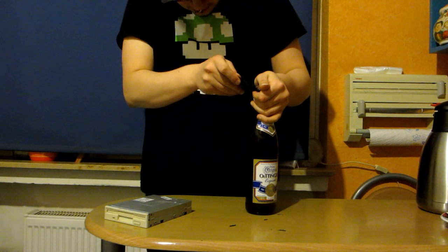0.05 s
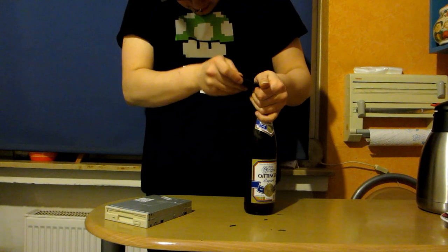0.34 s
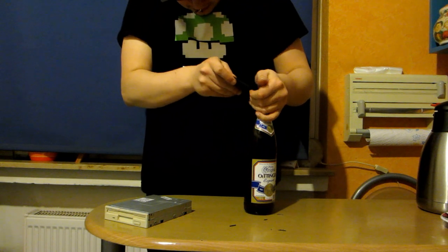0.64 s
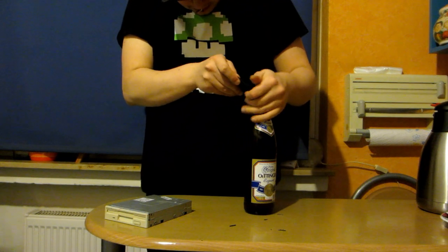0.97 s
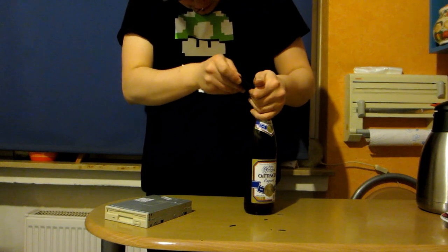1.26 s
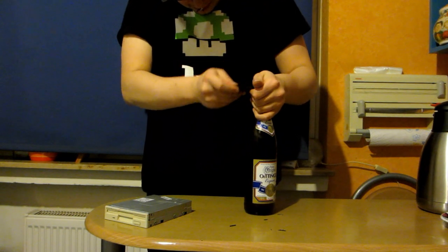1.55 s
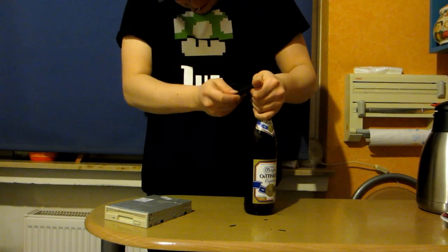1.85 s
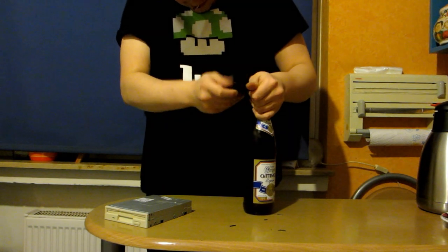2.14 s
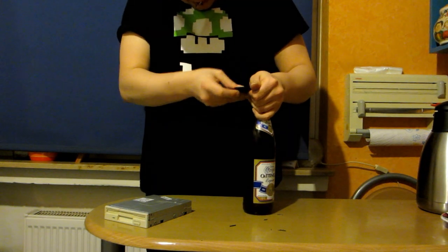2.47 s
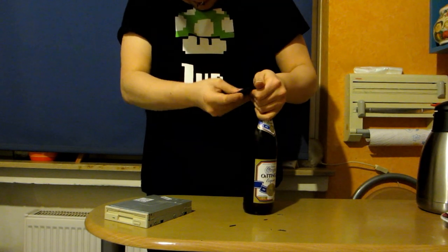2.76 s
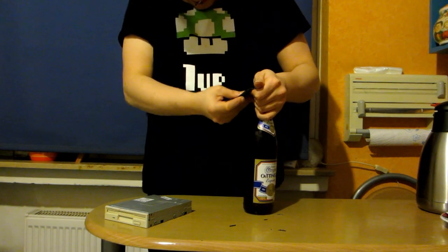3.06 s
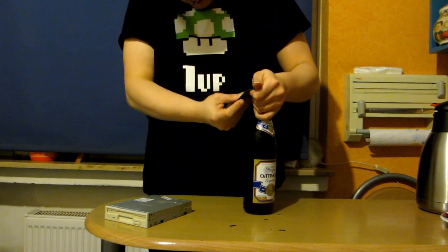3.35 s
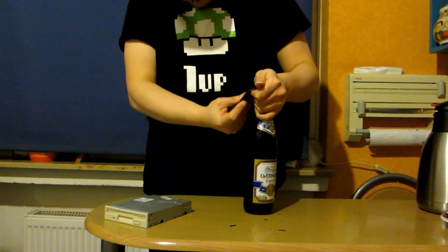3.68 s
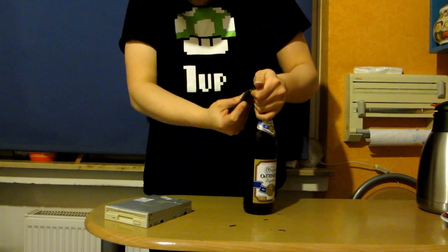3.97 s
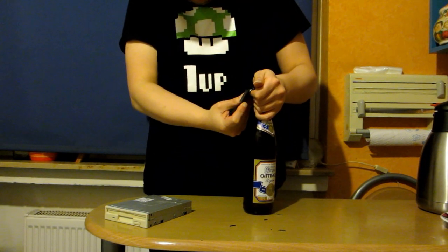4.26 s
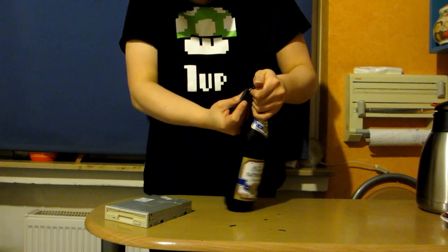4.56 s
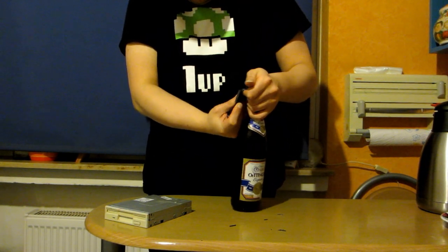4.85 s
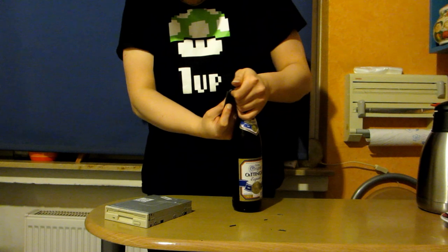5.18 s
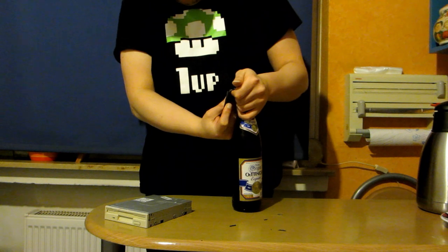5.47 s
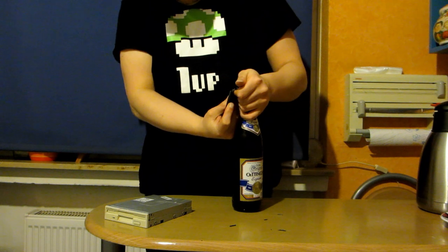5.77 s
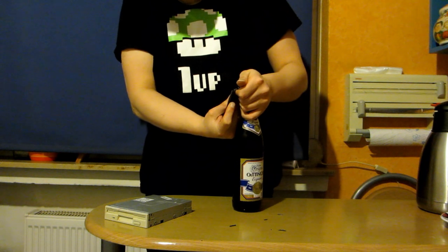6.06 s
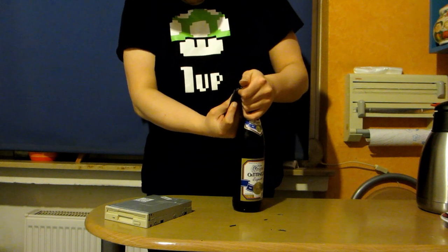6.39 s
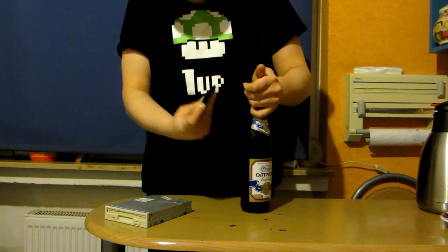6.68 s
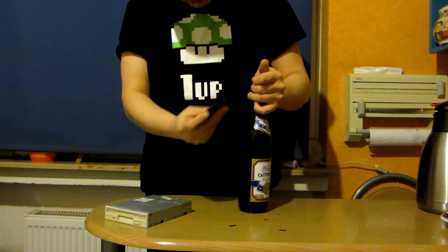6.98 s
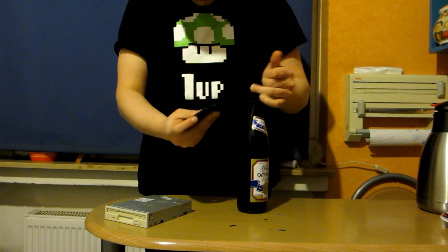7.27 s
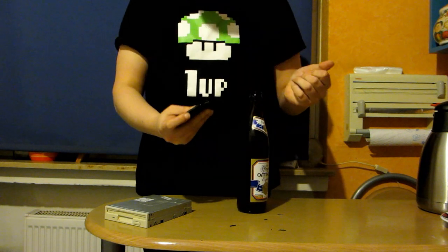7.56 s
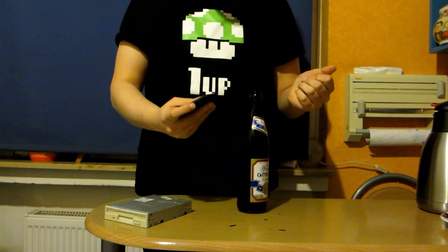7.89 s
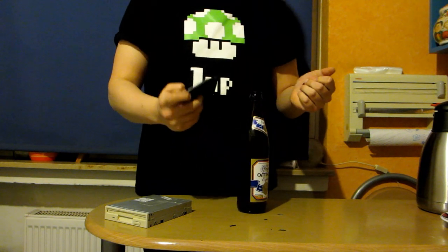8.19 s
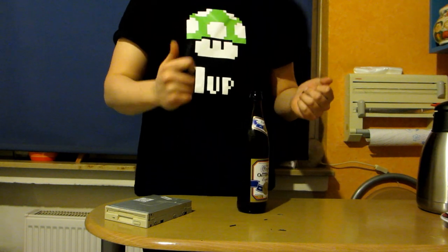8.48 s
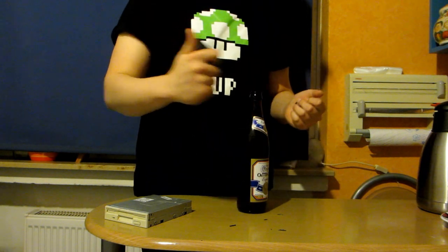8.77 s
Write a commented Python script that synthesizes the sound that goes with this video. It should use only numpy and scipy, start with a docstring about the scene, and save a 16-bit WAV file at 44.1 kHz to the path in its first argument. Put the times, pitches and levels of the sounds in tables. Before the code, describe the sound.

In a bare, ringing kitchen, a glass bottle knocks dully on a table while a plastic disk scrapes and slips off its metal cap in irregular clicks and sharp snaps. The bottle skids briefly, then opens with a loud pop and a puff of gas. A few knocks and light ticks follow, and the disk lands on the table with a boom. A low hum and faint camera whirr sit close to the microphone.

```python
"""Bare, ringing kitchen: a flat plastic disk is levered under the crown cap of a glass bottle.
Its edge scrapes and snaps off the crimps; the bottle knocks and skids, driving the table's modes.
The seal breaks: the air in the neck rings, gas puffs out, the cap flicks free.
The disk lands on the table with a boom. Underneath: low hum, whirr and steps of a camera's lens drive."""
import sys
import numpy as np
from scipy import signal
from scipy.fft import rfft, irfft
from scipy.io import wavfile

SR = 44100
rng = np.random.default_rng(int(sys.argv[2]) if len(sys.argv) > 2 else 0)


def materialize(psi):
    """Save the field psi as 16-bit PCM at rate SR to the path in sys.argv[1].

    A 1-D psi becomes a single channel; in a 2-D psi each row is a channel.
    """
    bounded = np.clip(np.atleast_2d(psi).T, -1, 1)
    quanta = np.round(bounded * 32767).astype(np.int16)
    wavfile.write(sys.argv[1], SR, quanta)


N = 398223
TIME_S = np.arange(N) / SR
CUTOFF_HZ = 16000


def from_db(db):
    """Decibels to gain."""
    return 10 ** (np.asarray(db) / 20)


def unit(x):
    """Scale to unit energy."""
    return x / np.sqrt(np.sum(x ** 2) + 1e-20)


def envelope(points):
    """Gain curve from (time [s], level [dB]); silent outside the points."""
    times_s, levels_db = np.transpose(points)
    return from_db(np.interp(TIME_S, times_s, levels_db, left=-200, right=-200))


def at_hz(points, hz):
    """Interpolate on a log-frequency axis."""
    points = np.array(points)
    return np.interp(np.log(hz + 1e-9), np.log(points[:, 0]), points[:, 1])


def colour(points, size=4096):
    """Unit-energy, minimum-phase impulse response from (frequency [Hz], level [dB])."""
    magnitude = from_db(at_hz(points, np.fft.rfftfreq(size, 1 / SR)))
    cepstrum = irfft(np.log(magnitude))
    cepstrum[1:size // 2] *= 2
    cepstrum[size // 2 + 1:] = 0
    return unit(irfft(np.exp(rfft(cepstrum))))


def through(x, response):
    """Convolve, keeping the input length."""
    return signal.oaconvolve(x, response)[:len(x)]


def butter(x, order, hz, kind):
    """Causal Butterworth filter."""
    return signal.sosfilt(signal.butter(order, hz, kind, fs=SR, output="sos"), x)


def modes(rows):
    """One second of decaying sines, alternating in sign."""
    t = TIME_S[:SR]
    return sum((-1) ** k * from_db(db) * 1e-3 ** (t / t60_s) * np.sin(2 * np.pi * hz * t)
               for k, (hz, db, t60_s) in enumerate(rows))


def burst(t60_s):
    """Dying flurry of tiny slips, as decaying noise."""
    t = TIME_S[:SR // 2]
    return unit(rng.standard_normal(len(t)) * 1e-3 ** (t / t60_s))


def grains(per_s, spread_db):
    """Random stick-slip impulses of uneven size, rms 1."""
    sizes = from_db(spread_db * np.minimum(rng.exponential(1, N), 4))
    signs = rng.choice([-1, 1], N)
    slips = rng.random(N) < per_s / SR
    return unit(sizes * signs * slips) * np.sqrt(N)


def add(track, time_s, sound):
    """Mix a sound in at time_s."""
    start = round(time_s * SR)
    track[start:start + len(sound)] += sound[:N - start]


# Room decay (frequency [Hz], T60 [s])
ROOM_DECAY = [(150, .62), (400, 0.45), (1000, 0.37), (2700, 0.49), (7000, 0.38), (14000, 0.22)]

def kitchen(wet_db, build_s=0.001, crack_gain=0.9):
    """New random room path per call: direct sound, close bounces, a tail dying soonest at the top."""
    t, hz = TIME_S[:SR], np.fft.rfftfreq(SR, 1 / SR)
    white = rfft(rng.standard_normal(SR))
    centres_hz, decays_s = np.transpose(ROOM_DECAY)
    tail = 0
    for weights, t60_s in zip(np.eye(len(centres_hz)), decays_s):
        band = at_hz(list(zip(centres_hz, weights)), hz)
        tail += irfft(white * band, SR) * 1e-3 ** (t / t60_s)
    response = from_db(wet_db) * unit(tail * (1 - np.exp(-t / build_s)))
    add(response, 0, crack_gain * burst(t60_s=0.018))
    response[0] += 0.5
    return unit(response)


# Room rumble spectrum (frequency [Hz], level [dB])
RUMBLE_SPECTRUM = [(25, -9.5), (65, -8), (97, -0.5), (135, -5), (175, -4.5), (400, -11), (700, -11.5),
                   (950, -12), (1300, -33)]
# Lens drive whirr spectrum (frequency [Hz], level [dB])
WHIRR_SPECTRUM = [(700, -27), (1030, -25.5), (1150, -1), (1235, 1.5), (1330, -3), (1600, -13.5),
                  (2200, -24.5), (3300, -32.5), (5000, -39.5), (6800, -35.5), (8500, -40), (16000, -36)]
# Hum and whine (frequency [Hz], rms level [dB])
HUM_TONES = [(96.9, -52.5), (172.3, -57.5), (780.6, -60.5), (3391, -78), (12409, -78.5)]

def background(rumble_db=-44, whirr_db=-45):
    """Steady room rumble, lens drive whirr, hum and whine."""
    rumble = through(rng.standard_normal(N), colour(RUMBLE_SPECTRUM + [(2000, -38), (5000, -67.5)]))
    whirr = through(rng.standard_normal(N), colour(WHIRR_SPECTRUM))
    hum = sum(np.sqrt(2) * from_db(db) * np.sin(2 * np.pi * (hz * TIME_S + rng.random()))
              for hz, db in HUM_TONES)
    return from_db(rumble_db) * rumble + from_db(whirr_db) * whirr + hum


# Lens drive steps (time [s], level [dB])
LENS_STEPS = [(1.2566, -18), (2.739, -26), (3.132, -19.5), (3.550, -12), (4.062, -29.5), (4.3826, -13.5),
              (5.028, -21.5)]

def lens_steps(ring_hz=1250, t60_s=0.013, rebound_s=0.00467, rebound_db=-5):
    """Each drive step rings twice inside the camera body."""
    out = np.zeros(N)
    ring = butter(modes([(ring_hz, 0, t60_s)]), 1, [900, 1800], "band")
    for time_s, db in LENS_STEPS:
        add(out, time_s, from_db(db) * ring)
        add(out, time_s + rebound_s, from_db(db + rebound_db) * ring)
    return out


# Tiny dry clicks (time [s], level [dB])
DRY_CLICKS = [(0.626, -29), (0.833, -32), (1.255, -28), (3.3358, -30), (4.2328, -32.5), (4.381, -25.5),
              (5.0035, -31)]

def clicks(faint_per_s=1.6, faint_db=-35, faint_end_s=5.1):
    """Clicks too near and weak to excite the room; fainter ones fall at random."""
    out = np.zeros(N)
    tone = colour([(1500, -11.5), (3800, -2), (5500, -1), (11000, 2), (16000, -12)])
    faint_times_s = rng.uniform(0, faint_end_s, round(faint_per_s * faint_end_s))
    for time_s, db in DRY_CLICKS + [(s, faint_db) for s in faint_times_s]:
        add(out, time_s, from_db(db) * unit(through(burst(t60_s=0.012), tone)))
    return out


def finger_slide(start_s=7.9, end_s=8.2, start_hz=4900, end_hz=4050, settle_s=0.09, level_db=-63):
    """Fingertip along the disk: friction noise in one narrow, sinking resonance."""
    hz = end_hz + (start_hz - end_hz) * np.exp(-np.maximum(TIME_S - start_s, 0) / settle_s)
    friction = unit(butter(rng.standard_normal(N), 2, 420, "low")) * np.sqrt(2 * N)
    whistle = friction * np.sin(2 * np.pi * np.cumsum(hz) / SR)
    return whistle * envelope([(start_s, level_db), (end_s, level_db)])


# Strokes over the cap (start [s], length [s], level [dB])
RUB_STROKES = [(0.004, 0.028, -42.5), (0.059, 0.013, -48), (1.073, 0.022, -46.5), (1.176, 0.017, -47),
               (2.18, 0.033, -34), (2.416, 0.089, -26.5), (2.717, .02, -57), (3.67, 0.017, -41),
               (3.935, 0.011, -50), (5.581, 0.051, -46.5), (8.197, .015, -45), (8.272, .02, -47.5),
               (8.37, 0.1, -41), (8.604, 0.022, -47.5)]
# Rubbing spectrum (frequency [Hz], level [dB])
RUB_SPECTRUM = [(250, -10.5), (450, 1.5), (700, -4), (1550, -3.5), (2150, 5), (2700, -4), (4000, -13),
                (6000, -17), (12000, -20), (16000, -25.5)]

def rubbing(swell_db=10.5, release_db_per_s=210.5):
    """Skin and plastic drag over the cap in fine grains; pressure builds, then eases."""
    pressure = np.zeros(N)
    for start_s, length_s, db in RUB_STROKES:
        end_s = start_s + length_s
        pressure += envelope([(start_s, db - swell_db), (end_s, db), (end_s + 1, db - release_db_per_s)])
    return through(grains(per_s=1200, spread_db=5) * pressure, colour(RUB_SPECTRUM))


# Light touches (time [s], level [dB], spectral peak [Hz])
TOUCHES = [(0.395, 2, 11300), (1.279, -18, 3000), (1.657, -4.5, 8100), (3.755, -19, 4000),
           (6.777, -13.5, 12000), (7.277, -8.5, 7700), (7.646, -0.5, 5350), (7.902, -19, 5000),
           (8.202, -23, 3950), (8.278, -21.5, 5000), (8.436, -20, 3500), (8.51, -15, 8000)]

def ticks():
    """Fingernails, plastic and cap touch; each contact has its own broad, bright peak."""
    out = np.zeros(N)
    for time_s, db, peak_hz in TOUCHES:
        tone = colour([(500, -18), (peak_hz / np.sqrt(2), -9), (peak_hz, 0), (CUTOFF_HZ, -11)])
        add(out, time_s, from_db(db) * through(kitchen(wet_db=9), tone))
    return out


# Disk and hand hitting the table (time [s], level [dB])
LANDING_HITS = [(8.990, 18), (9.004, 19.5)]
# Table boom spectrum (frequency [Hz], level [dB])
BOOM_SPECTRUM = [(25, -4), (55, -9), (90, 4), (150, -5.5), (300, -16.5), (1000, -24), (4000, -32),
                 (9000, -47), (16000, -63)]

def landing():
    """Heavy, soft blows make the whole table boom; the deep bass leans right."""
    boom = np.zeros(N)
    for time_s, db in LANDING_HITS:
        add(boom, time_s, from_db(db) * unit(through(kitchen(wet_db=17), colour(BOOM_SPECTRUM))))
    return boom + butter(boom, 1, 110, "low") * [[-0.5], [0.5]]


# Shoves on the bottle (start [s], hold [s], level [dB])
BOTTLE_SHOVES = [(4.648, .1, -18.5), (4.842, 0.065, -26.5), (4.95, 0.082, -32.5)]

def sliding_speed(attack_s=0.029, release_s=0.015):
    """Relative bottle speed: each shove builds, holds, dies away."""
    speed = np.zeros(N)
    for start_s, hold_s, db in BOTTLE_SHOVES:
        rise = np.exp(np.minimum(TIME_S - start_s, 0) / attack_s)
        fall = np.exp(-np.maximum(TIME_S - start_s - hold_s, 0) / release_s)
        speed += from_db(db) * rise * fall
    return speed


# Base judder spectrum (frequency [Hz], level [dB])
JUDDER_SPECTRUM = [(60, -28), (150, -3), (270, -12), (380, 0.5), (500, -9), (680, -11), (820, -11),
                   (1100, -20.5), (2400, -27.5), (3500, -44.5), (6000, -62)]
# Grit hiss spectrum (frequency [Hz], level [dB])
GRIT_SPECTRUM = [(1700, -34), (3500, -7.5), (5000, -5), (7000, -3), (11400, 1.5), (13100, -2.5),
                 (16000, -13)]
# Grit hiss as the bottle tilts and slides (time [s], level [dB])
GRIT_ENVELOPE = [(4.3, -74), (4.344, -59), (4.522, -55), (4.646, -45), (4.778, -41.5), (4.866, -49),
                 (4.98, -74)]

def skid(judder_db=-4, groan_db=-5, groan_hz=372, wander_rad=0.0161):
    """The base judders over the table; slips lock to one mode as a groan; grit hisses under the glass."""
    speed = sliding_speed()
    slips = grains(per_s=700, spread_db=2.5) * speed
    judder = from_db(judder_db) * through(slips, colour(JUDDER_SPECTRUM))
    drift_rad = np.cumsum(wander_rad * rng.standard_normal(N))  # uneven slips blur the pitch
    grip = np.interp(TIME_S, np.linspace(0, TIME_S[-1], 500), rng.rayleigh(1, 500))  # catch and release
    groan = from_db(groan_db) * grip * speed * np.sin(2 * np.pi * groan_hz * TIME_S + drift_rad)
    hiss = through(rng.standard_normal(N), colour(GRIT_SPECTRUM)) * envelope(GRIT_ENVELOPE)
    return groan + through(judder + hiss, kitchen(wet_db=-0.5))


# Bottle base contacts (time [s], level [dB], low-pass cutoff [Hz])
BASE_KNOCKS = [(0.426, 12.5, 1490), (0.460, 19, 1160), (0.485, 17.5, 860), (0.775, -2.5, 550),
               (1.290, 3.5, 1300), (4.884, 5, 220), (6.540, 18, 700), (7.250, 20, 700), (7.286, 19.5, 557),
               (7.298, 14.5, 552)]
# Table top loaded by the bottle (frequency [Hz], level [dB], T60 [s])
TABLE_MODES = [(144.1, -0.5, 0.37), (174, -9.5, 0.52), (238.4, 0, 0.27), (363.3, -6, 0.25),
               (445, -2.5, .25), (481, -7.5, 0.46), (530, -9.5, 0.19), (598, -6, 0.23), (668, -12, 0.31),
               (918, -4, 0.23), (962, -3, .2), (1120, -13, 0.11), (1340, -11, .15), (1670, -19.5, .15)]
# Contact thud spectrum (frequency [Hz], level [dB])
THUD_SPECTRUM = [(60, -35.5), (130, -5.5), (230, -1.5), (300, -12), (480, -0.5), (720, -6), (950, -7),
                 (1500, -6.5), (3000, -10.5), (6000, -28)]

def knocks(wood_gain=0.7, scatter_db=0.67):
    """The glass base rocks on the table; soft contacts drive a dull thud and the table's modes."""
    out = np.zeros(N)
    for time_s, db, cutoff_hz in BASE_KNOCKS:
        wood = modes([(hz, mode_db + rng.normal(0, scatter_db), t60_s)
                      for hz, mode_db, t60_s in TABLE_MODES])
        wood = butter(unit(wood), 2, 105, "high")  # the board radiates no deep bass
        thud = through(kitchen(wet_db=6.5, build_s=0.0022), colour(THUD_SPECTRUM))
        knock = butter(wood_gain * wood + thud, 2, cutoff_hz, "low")
        add(out, time_s, from_db(db) * unit(knock))
    return out


# Disk edge slipping off the cap; the rows at 6.547 and 6.552 s are the freed cap flicking off (time [s], level
# [dB], ring centre [Hz], ring boost [dB], treble [dB])
EDGE_SNAPS = [(1.352, 10, 1770, 11, -9), (1.468, 9, 2140, 14, -15), (1.478, 14, 1700, 6, -6.5),
              (1.874, 3.5, 2000, 10, -6.5), (1.919, 22.5, 1160, 10.5, 2), (2.181, 0.5, 3300, 4.5, -2.5),
              (2.192, 4, 3350, 4.5, -1.5), (2.412, -4.5, 1100, 7, -9), (2.444, 0, 1060, 7.5, -6),
              (2.485, 9, 972, 12.5, -3.5), (2.506, 13.5, 933, 5, -3.5), (2.803, 17, 504, 12.5, -2.5),
              (3.001, 22, 2260, 9.5, 3.5), (3.430, 16, 1440, 8, 3.5), (3.669, -3.5, 2900, 5.5, -5.5),
              (6.547, 18, 4170, 1.5, -0.5), (6.552, 19, 1840, 6, -3.5), (6.996, -0.5, 1337, 4.5, 2),
              (7.65, 0, 1160, 10, -28)]
# Snap spectrum with a fist round the neck (frequency [Hz], level [dB])
SNAP_SPECTRUM = [(45, -25.5), (90, -11.5), (150, -1), (290, -7), (420, 3.5), (680, -2), (950, 0.5),
                 (1500, -1.5), (2600, -1), (4500, -5), (6500, -4), (10000, -4), (13000, -4), (16000, -15.5)]

def snaps(ring_half_width_oct=0.28, slack_knock_db=9.5, knock_loss=1.27, bite_share=0.42):
    """The edge, or the freed cap, lets go with a crack; a tighter grip gives more broad ring and less low
    knock."""
    out, grid_hz = np.zeros(N), np.geomspace(40, CUTOFF_HZ, 300)
    for time_s, db, ring_hz, ring_db, treble_db in EDGE_SNAPS:
        knock_db = slack_knock_db - knock_loss * ring_db
        grip = [(450, knock_db), (900, 0), (1900, 0), (3500, bite_share * treble_db), (8000, treble_db)]
        resonance_db = ring_db / (1 + (np.log2(grid_hz / ring_hz) / ring_half_width_oct) ** 2)
        spectrum_db = at_hz(SNAP_SPECTRUM, grid_hz) + at_hz(grip, grid_hz) + resonance_db
        tone = colour(list(zip(grid_hz, spectrum_db)))
        crack = kitchen(wet_db=7.5, build_s=0.002, crack_gain=1.1)
        add(out, time_s, from_db(db) * through(crack, tone))
    return out


# Air in the neck (frequency [Hz], level [dB], T60 [s])
NECK_MODES = [(140.4, 3.5, .1), (180, -1, 0.068), (497, -2, .07), (906, -8.5, 0.032), (1383, -0.5, 0.089)]
# Lingering hum of the open bottle (frequency [Hz], level [dB], T60 [s])
OPEN_BOTTLE_MODES = [(174, -30, 3.1), (179, -41, 2.6), (376, -30, 1.08)]
# Freed cap (frequency [Hz], level [dB], T60 [s])
CAP_MODES = [(1678, -3, 0.15), (1873, -6, .2), (2040, -6.5, .22), (3990, -4, 0.069), (4450, -3, .05)]

def pop(seal_s=6.5325, cap_s=6.551, neck_db=23, gas_db=14, cap_db=15):
    """The seal breaks: neck air rings, gas spurts into the room, the cap flicks free."""
    out = np.zeros(N)
    spurt = colour([(60, -7), (140, 2), (300, -32), (490, 3.5), (800, -10.5), (1700, -5.5),
                    (4000, -12), (10000, -14.5), (16000, -30)])
    add(out, seal_s, from_db(neck_db) * unit(modes(NECK_MODES)) + modes(OPEN_BOTTLE_MODES))
    add(out, seal_s, from_db(gas_db) * through(kitchen(wet_db=5, build_s=0.0041), spurt))
    add(out, cap_s, from_db(cap_db) * unit(through(kitchen(wet_db=13.5), modes(CAP_MODES))))
    return out


def scene():
    """Stereo mix; all centred except the landing."""
    hands = snaps() + ticks() + through(rubbing() + finger_slide(), kitchen(wet_db=-3))
    bottle = knocks() + skid() + pop()
    return hands + bottle + landing() + lens_steps() + clicks() + background()


def record(dry):
    """Peaks flattened just under full scale, then a steep low-pass."""
    clipped = np.clip(dry, -0.95, 0.95)
    return signal.sosfilt(signal.ellip(10, 0.2, 80, CUTOFF_HZ, fs=SR, output="sos"), clipped)


dry = scene()
out = record(dry)
materialize(out)
```